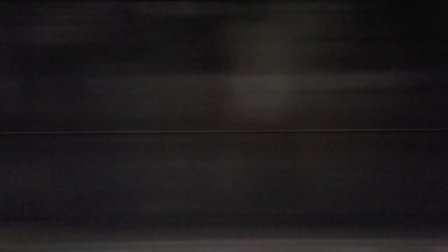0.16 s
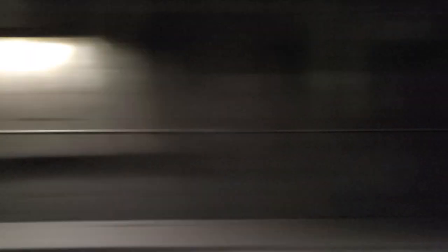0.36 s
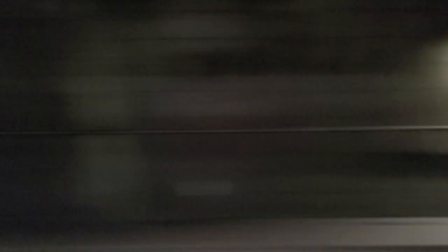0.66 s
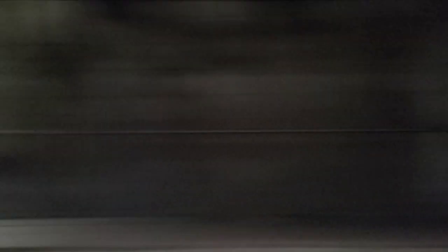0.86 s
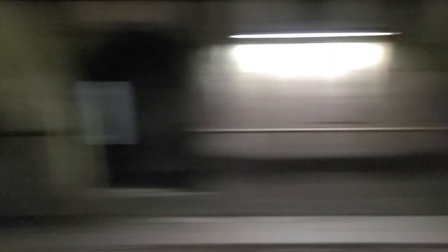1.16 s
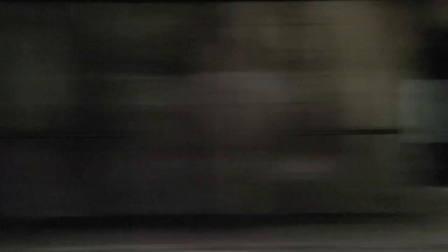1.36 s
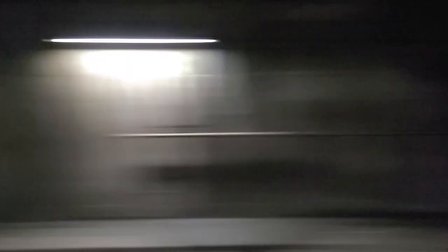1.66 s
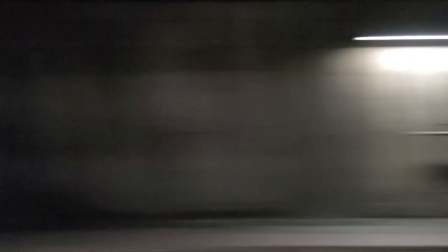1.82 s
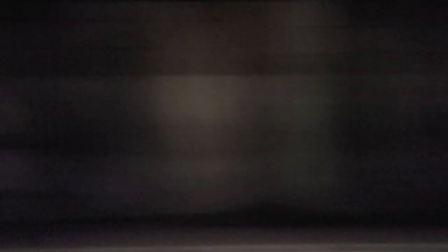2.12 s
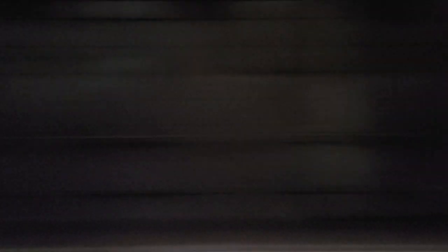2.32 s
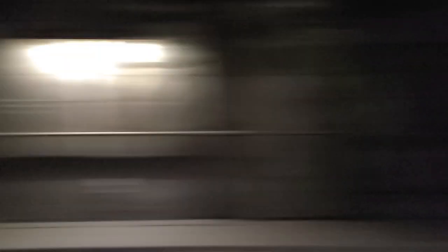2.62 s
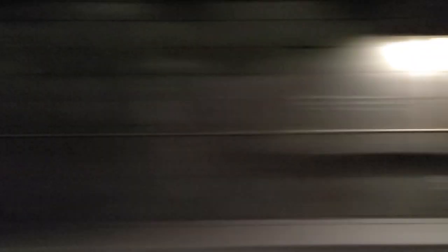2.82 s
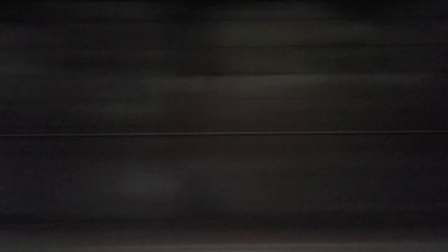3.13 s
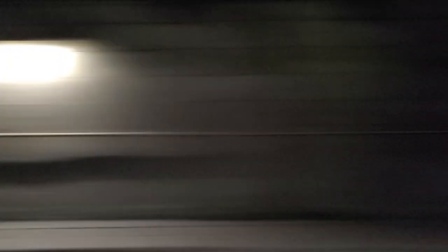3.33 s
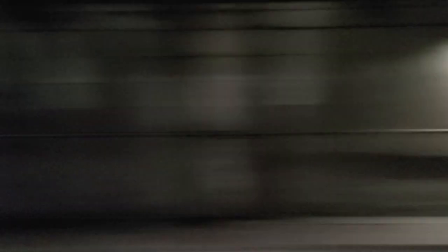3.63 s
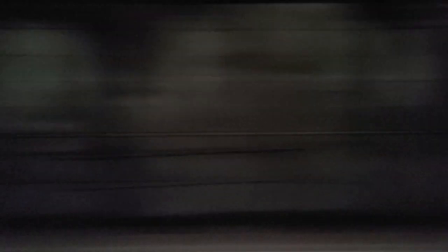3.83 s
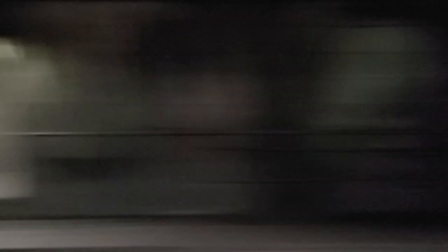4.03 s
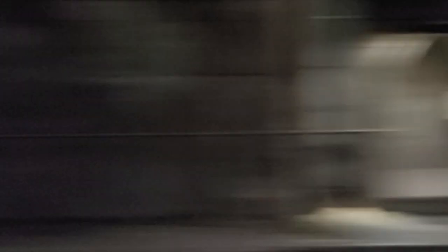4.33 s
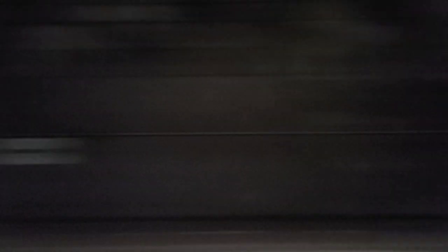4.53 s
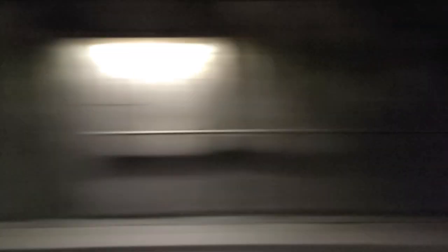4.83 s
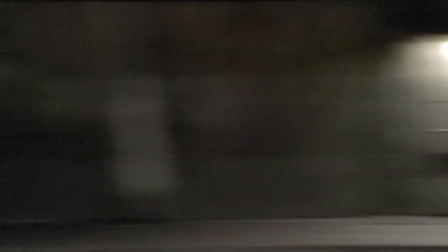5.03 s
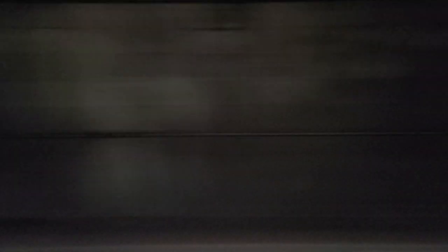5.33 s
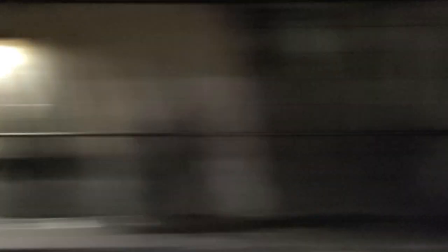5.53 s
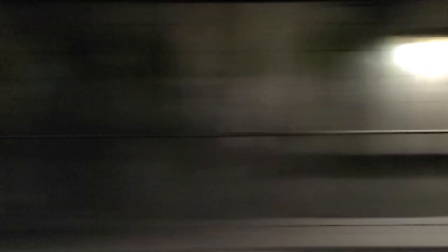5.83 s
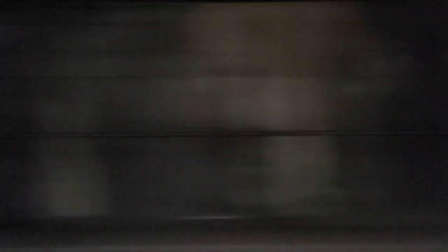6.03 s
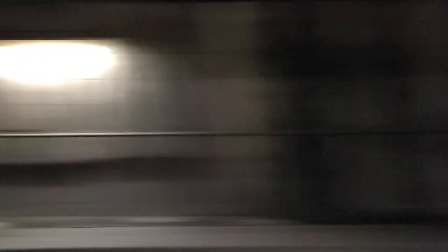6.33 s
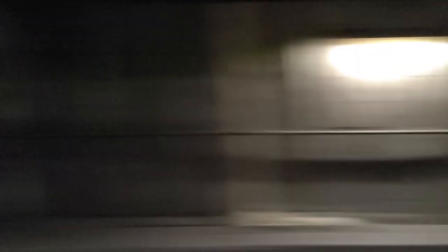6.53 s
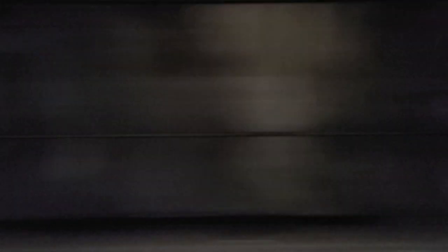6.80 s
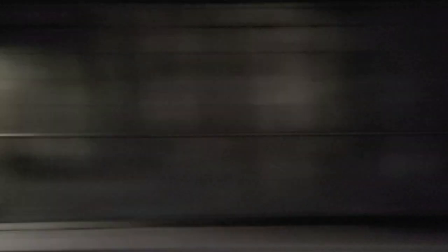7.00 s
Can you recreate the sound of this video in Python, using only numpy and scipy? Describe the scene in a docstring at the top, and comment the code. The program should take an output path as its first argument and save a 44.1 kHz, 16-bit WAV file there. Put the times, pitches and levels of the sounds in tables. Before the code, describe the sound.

Continuous tunnel ride heard within the car by two spaced microphones. A rough opening of throbbing low booms, gritty roar and rushing noise subsides after two seconds into even rolling. The roar and low gear hum slowly swell again, with soft bumps of boom later on. Ventilation hiss stays very faint, and two tiny bright metallic taps come just before the end.

```python
"""Metro car in a tunnel

Inside the car, on two spaced microphones: wheel and rail roughness shakes the floor into a rumble of shaped
noise, with wavering tones for the booming body. Bands of noise make the rail roar off the tunnel walls, a harsh
rush that surges with the loud rumble, slow air pressure and ventilation; thin tones make gear hum, whistles and
motor whine. The ride opens loud, runs smooth and slowly gathers; a small metal fitting clinks twice."""
import sys
import numpy as np
from scipy import signal
from scipy.fft import rfft, irfft, next_fast_len
from scipy.io import wavfile
from scipy.ndimage import uniform_filter1d

SR = 44100
rng = np.random.default_rng(int(sys.argv[2]) if len(sys.argv) > 2 else 0)


def dump(signal):
    """Clip the signal to [-1, 1] and save it as 16-bit WAV at the path in sys.argv[1]."""
    limited = np.clip(np.atleast_2d(signal).T, -1, 1)
    pcm = np.round(limited * 32767).astype(np.int16)
    wavfile.write(sys.argv[1], SR, pcm)


N = 315756  # samples, about 7.16 s

# Course of the ride before surges: t/s, then level/dB of deep rumble, upper rumble, rail roar, rush
RIDE = [(0.0, -19, -21.5, -20, -42), (0.6, -18.5, -18.5, -22, -37.5), (1.25, -18, -20.5, -26, -38.5),
        (1.8, -21.5, -22.5, -27.5, -42.5), (2.2, -24, -28, -27.5, -48), (2.8, -25, -28.5, -26.5, -51.5),
        (3.55, -24, -27.5, -26, -55), (4.3, -23, -26, -24, -50.5), (5.4, -21, -27, -23, -49),
        (6.0, -21, -24, -23, -47.5), (7.16, -21.5, -27.5, -22.5, -44)]
# Surges of the rumble and rush: start t/s, length/s, lift/dB
SURGES = [(-.1, .18, 3), (.29, .16, 4), (.81, .29, 5), (1.42, .34, 6), (1.93, .14, 2.5), (4.98, .14, 2.5),
          (6.17, .19, 6)]
SURGE_EDGE_S = 0.15
SURGE_SHARES = [0.49, 0.5, 0.16, 1]  # share of the lift in dB taken by deep, upper, roar, rush

# Colour of the floor rumble: f/Hz, level/dB
RUMBLE_COLOUR = [(26, -38), (45, -9.5), (65, -2.5), (96, -5.5), (135, -4.5), (156, -7.5), (180, -7),
                 (250, -8.5), (328, -10), (370, -8.5), (498, -20), (620, -23), (810, -58.5), (1360, -120)]
RUMBLE_SPLIT_HZ = 265  # the floor panels above this pitch swell apart from the frame below it
# Resonances of wheel, rail and floor in the rolling noise: f/Hz, width/Hz, lift/dB
WHEEL_MODES = [(261.4, 18, 3.5), (664, 44, 3), (1550, 24, 3.5), (1800, 140, 2.5), (2300, 250, 1.5),
               (2440, 100, -0.5)]

# Body booms between swells, low, high and panel: f/Hz, mean level/dB, share of the deep rumble's swing,
# wander/Hz, unsteadiness/dB
BOOM_MURMUR = [(65, -29, .7, 3, 4), (94, -32, .1, 7, 4), (196, -40, .7, 8, 4)]
# Loud swells of the lower boom: start t/s, length/s, level/dB, f/Hz
LOW_SWELLS = [(0.04, 0.2, -16.5, 65.1), (0.29, .35, -20, 65.46), (0.739, 0.18, -16, 64.3),
              (1.02, 0.38, -16, 62.4), (1.34, 0.19, -16.5, 63.8), (1.636, 0.1, -17, 63.7),
              (1.914, 0.14, -20.5, 64.3), (3.957, 0.049, -21.5, 63.5), (4.088, 0.072, -21.5, 61),
              (4.982, .13, -20, 63.9), (5.155, 0.17, -24, 67.86), (5.401, 0.14, -18.5, 67.35),
              (5.992, 0.1, -17.5, 66.46), (6.134, 0.13, -17.5, 69.3), (6.374, 0.1, -17.5, 64.9),
              (6.641, 0.18, -17.5, 68), (6.998, 0.14, -21, 66.7)]
# Loud swells of the upper boom: start t/s, length/s, level/dB, f/Hz
HIGH_SWELLS = [(0.009, 0.24, -20, 102), (0.29, 0.2, -22.5, 97.9), (0.57, 0.13, -23, 95.7),
               (1.587, 0.14, -33, 100.7), (2.42, 0.12, -21.5, 99.3), (3.611, 0.099, -21.5, 94.8),
               (5.018, .12, -20, 97.7), (5.365, 0.13, -24, 93.1), (5.56, .09, -23, 98.1),
               (5.74, 0.076, -19.5, 95.7), (6.05, 0.084, -22.5, 93.5), (6.169, 0.12, -15.5, 94.4),
               (6.658, 0.13, -24.5, 95.5), (6.867, 0.14, -22.5, 97.7)]
# Swells of a floor panel above the booms: start t/s, length/s, level/dB, f/Hz
PANEL_SWELLS = [(.8, 0.15, -22.5, 195.3), (1.446, 0.26, -21.5, 198.2), (1.779, 0.11, -26.5, 190.7)]
SWELL_EDGE_S = 0.039
# Gear hum gathering under load and dropping back: t/s, level/dB
GEAR_HUM = [(0, -36), (3.9, -35), (4.15, -30), (4.55, -28.5), (4.85, -25), (5.0, -27), (5.15, -35),
            (5.3, -35), (5.42, -26.5), (5.8, -27), (6.1, -24.5), (6.25, -36), (6.55, -32), (6.7, -27),
            (6.9, -25), (7.05, -33), (7.16, -36)]
GEAR_HZ = 156.6
# A hum that rises and passes: t/s, f/Hz, level/dB
PASSING_HUM = [(1.05, 141, -30), (1.3, 142, -24), (1.45, 135, -23), (1.7, 138.5, -22), (1.9, 139.5, -25),
               (2.1, 140, -31), (2.3, 142, -34)]

# Colour of the rail roar: f/Hz, level/dB
ROAR_COLOUR = [(300, -20.5), (455, -8.5), (605, -9), (700, -5.5), (836, -3.5), (947, -5.5), (1130, -7),
               (1380, -18), (1500, -19.5), (1650, -16.5), (1920, -21), (2280, -21.5), (2800, -25),
               (3100, -26), (3700, -37.5), (4300, -37.5), (4900, -41.5), (6300, -48), (8000, -56.5)]
# Wheel rings that sing in patches: f/Hz, width/Hz, level/dB re roar, wander/Hz, patch depth/dB,
# level change in the loud opening/dB
WHEEL_SONG = [(815.5, 12, -15.5, 5, 3, -9.5), (841, 14, -14.5, 7, 2, -9.5), (1635, 120, -22, 30, 3, 0),
              (2325, 240, -22.5, 50, 3, 4.5)]
# How much of that level change applies: t/s, share
LOUD_OPENING = [(0, 1), (.9, 1), (1.3, 0.24), (2.0, .3), (3.5, 0), (4.0, 0.018), (7.16, 0.039)]

# Colour of the harsh rush: f/Hz, level/dB
RUSH_COLOUR = [(900, -8), (1250, -14), (1500, 0), (1900, -5.5), (2400, -7), (3500, -21), (4300, -21.5),
               (5600, -24), (6300, -27), (7300, -24.5), (8000, -32), (9000, -32.5), (10500, -37.5),
               (13000, -43.5), (16000, -61)]
RUSH_SPLIT_HZ, RUSH_TREBLE_DB = 4900, -17.5  # treble level re middle

# Slow air pressure in the car: t/s, level/dB
BUFFET = [(0.0, -23), (.3, -17.5), (.5, -33), (1.3, -35), (1.55, -53), (2.0, -32.5), (3.2, -24.5),
          (4.4, -27.5), (5.4, -28.5), (6.3, -27.5), (7.16, -21)]
# Colour of that pressure: f/Hz, level/dB
BUFFET_COLOUR = [(12, -22), (24, -5.5), (45, -8.5), (60, -30)]

# Small metal fitting, the taps: t/s, level/dB, brightness/dB per octave
CLINKS = [(6.8575, -43, 0), (6.906, -51, -3)]
# Ringing modes of the fitting: f/Hz, level/dB, t60/s
FITTING = [(6158, 1, .085), (7700, -17, .1), (8790, -20, .04), (9765, -17, .09), (9910, -15, .07),
           (10340, -20, .12), (10830, -22, .1), (11770, -14, .06), (12290, -7, .065), (12670, -11, .055),
           (13430, -22, .05), (14290, -15, .12), (15160, -26, .06)]
CLINK_ATTACK_S = .002

# Faint hums and whistles that follow the roar: f/Hz, level/dB re roar, wander/Hz, from t/s, until t/s
WHISTLES = [(308, -11, 3, .3, 1.0), (330, -12, 2, 4.2, 5.1), (689, -15, 2, .3, 1.8),
            (5385, -48, 8, .2, 1.8), (4673, -48.5, 4, 2.0, 7.3), (5082, -49.5, 5, 2.0, 7.3),
            (7014, -47, 5, 0, 7.3), (7219, -50, 9, 0, 7.3)]
# Motor whine: multiple of the motor pitch, level/dB re roar
MOTOR_ORDERS = [(10, -34), (11, -30), (12, -32.5), (13, -35), (14, -37)]
MOTOR_HZ, MOTOR_FROM_S = 205, 2.0
# Thin hum in the middle of the roar: t/s, level/dB
MID_HUM = [(2.4, -52), (3.0, -40), (3.6, -41), (3.75, -34), (4.2, -34), (4.4, -38), (5.0, -38), (5.17, -33),
           (5.5, -36), (6.2, -37), (6.6, -34), (7.16, -37)]
MID_HUM_HZ = 763

# Colour of the air hiss: f/Hz, level/dB
AIR_HISS = [(6000, -5), (8000, 0), (9000, 0), (10500, -5), (13000, -3), (14500, -5), (16000, -8)]
AIR_HISS_DB = -51.5  # re roar, before the growth below
# The air hiss gains on the roar: t/s, level/dB
AIR_GROWTH = [(0, -1), (3.5, 0.5), (5.5, 0), (6.3, 3.5), (7.16, 2)]
# Narrow hiss of the ventilation: f/Hz, width/Hz, level/dB
VENT_BAND = (7090, 530, -62)

# Level at the left microphone less the right: f/Hz, level/dB
LEFT_EAR = [(60, -0.5), (500, -1.5), (1200, -2), (2000, -0.5), (2400, -2), (3450, 4), (4300, -1),
            (6500, -4), (8300, -1.5), (12400, -10), (15000, -19.5)]
# An all-round field at two spaced microphones swings between alike and opposed: f/Hz, left-right likeness
LIKENESS = [(60, .99), (170, .94), (345, .89), (520, .6), (860, .08), (1400, -.36), (1750, -.29),
            (2300, .56), (2750, -.03), (3450, -.34), (4100, .31), (4800, -.2), (5500, 0), (6200, -.2),
            (6900, .2), (8000, .1), (9000, 0)]


def from_db(db):
    """Decibels to gain."""
    return 10 ** (np.asarray(db) / 20)


def rms_one(x):
    """Scaled to unit power."""
    return x / np.sqrt(np.mean(x ** 2) + 1e-20)


def in_time(rows):
    """Columns of a curve table, one value per sample."""
    s, *columns = np.transpose(rows)
    return [np.interp(np.arange(N) / SR, s, column) for column in columns]


def at_hz(points, hz):
    """A spectrum read on a log-frequency axis."""
    table_hz, values = np.transpose(points)
    return np.interp(np.log(hz + 1), np.log(table_hz), values)


def between(start_s, end_s):
    """One between two moments, with 0.2 s ramps inside them."""
    t = np.arange(N) / SR
    return np.clip((t - start_s) / .2, 0, 1) * np.clip((end_s - t) / .2, 0, 1)


def soft_window(start_s, length_s, edge_s):
    """Rise, hold and fall, with ramps centred on both ends."""
    t = np.arange(N) / SR
    return np.clip(np.minimum(t - start_s, start_s + length_s - t) / edge_s + .5, 0, 1)


def drift(rate_hz):
    """Slow chance of spread 1: noise at a fortieth of the sample rate through a double one-pole low-pass."""
    pole = np.exp(-80 * np.pi * rate_hz / SR)
    noise = rng.standard_normal(N // 40 + 2002)
    slow = signal.lfilter([1], [1, -2 * pole, pole * pole], noise)[2000:]  # settled part only
    return np.interp(np.arange(N) / 40, np.arange(len(slow)), rms_one(slow))


def wavering(hz, level_db, wander_hz, rate_hz):
    """A tone of given rms level whose pitch wanders at random."""
    turns = np.cumsum(hz + wander_hz * drift(rate_hz)) / SR + rng.random()
    return np.sqrt(2) * from_db(level_db) * np.sin(2 * np.pi * turns)


def diffuse(gain_at):
    """Coloured noise arriving from all round at two spaced microphones; unit power in their mean."""
    size = next_fast_len(N)
    hz = np.arange(size // 2 + 1) * SR / size
    alike = at_hz(LIKENESS, hz)
    mid, side = rfft(rng.standard_normal((2, size))) * gain_at(hz)
    pair = np.sqrt(1 + alike) * mid + np.sqrt(1 - alike) * side * [[1], [-1]]
    balance = from_db(at_hz(LEFT_EAR, hz) * [[.5], [-.5]])
    pair = irfft(pair * balance, size)[:, :N]
    return pair / np.std(pair.mean(axis=0))


def inside(spectrum, hz):
    """True between the ends of a tabled spectrum."""
    return (hz > spectrum[0][0]) * (hz < spectrum[-1][0])


def coloured(spectrum):
    """Diffuse noise with a tabled spectrum, silent beyond its ends."""
    return diffuse(lambda hz: from_db(at_hz(spectrum, hz)) * inside(spectrum, hz))


def surge():
    """Lift in dB during the surges: each one rises, holds and falls."""
    return sum(db * soft_window(s, length_s, SURGE_EDGE_S) for s, length_s, db in SURGES)


def ringing_db(hz):
    """Lift that the resonances of wheel, rail and floor give the rolling noise."""
    return sum(db / (1 + (2 * (hz - mode_hz) / width_hz) ** 2) for mode_hz, width_hz, db in WHEEL_MODES)


def rumble(deep_db, upper_db):
    """Wheel roughness through frame and floor: one colour, shared out between a deep and an upper part."""
    def colour(hz):
        return from_db(at_hz(RUMBLE_COLOUR, hz) + ringing_db(hz))
    deep = diffuse(lambda hz: colour(hz) / np.sqrt(1 + (hz / RUMBLE_SPLIT_HZ) ** 6))
    upper = diffuse(lambda hz: colour(hz) / np.sqrt(1 + (RUMBLE_SPLIT_HZ / (hz + 1)) ** 6))
    return from_db(deep_db) * deep + from_db(upper_db + .5 * drift(18)) * upper


def booms(deep_db):
    """Three body resonances: an unsteady murmur that gives way to loud swells with soft edges."""
    out = 0
    deep_swing_db = deep_db - deep_db.mean()
    for swells, murmur in zip((LOW_SWELLS, HIGH_SWELLS, PANEL_SWELLS), BOOM_MURMUR):
        hz, db, follows, wander_hz, unsteady_db = murmur
        gain = from_db(db + follows * deep_swing_db + unsteady_db * drift(5.4))
        pitch_hz = hz + wander_hz * drift(2.97)
        for s, length_s, level_db, swell_hz in swells:
            share = soft_window(s, length_s, SWELL_EDGE_S)
            gain = gain + share * (from_db(level_db) - gain)
            pitch_hz = pitch_hz + share * (swell_hz - pitch_hz)
        out = out + gain * wavering(pitch_hz, 0, 1.6, 8.6)
    return out


def body(deep_db):
    """Booms and hums carried by the car body: long waves, nearly the same at both microphones."""
    passing_hz, passing_db = in_time(PASSING_HUM)
    passing = wavering(passing_hz, passing_db, 1.0, 2.8)
    passing = passing * between(PASSING_HUM[0][0], PASSING_HUM[-1][0])
    gears = wavering(GEAR_HZ, in_time(GEAR_HUM)[0] + .7 * drift(5.0), .7, 4.0)
    return (booms(deep_db) + passing + gears) * from_db([[-.4], [.4]])


def rail_roar(roar_db):
    """Rolling noise ringing in the wheel modes and returned by the tunnel walls, made as shaped noise."""
    noise = diffuse(lambda hz: from_db(at_hz(ROAR_COLOUR, hz) + ringing_db(hz)) * inside(ROAR_COLOUR, hz))
    return from_db(roar_db + .5 * drift(7.7)) * noise


def wheel_song(roar_db):
    """Narrow rings of noise whose pitch wanders and whose strength comes in patches."""
    out, opening = 0, np.clip(in_time(LOUD_OPENING)[0], 0, 1)
    for hz, width_hz, db, wander_hz, patch_db, change_db in WHEEL_SONG:
        # slow complex noise shifted up to the ring's pitch
        lowpass = signal.butter(2, width_hz / 2, fs=SR, output="sos")
        slow = signal.sosfilt(lowpass, rng.standard_normal((4, N)))
        carrier = np.exp(2j * np.pi * np.cumsum(hz + wander_hz * drift(1.5)) / SR)
        mid, side = rms_one(np.real((slow[:2] + 1j * slow[2:]) * carrier))
        alike = at_hz(LIKENESS, hz)
        pair = mid + np.sqrt((1 - alike) / (1 + alike)) * side * [[1], [-1]]
        balance = from_db(at_hz(LEFT_EAR, hz) * np.array([[.5], [-.5]]))
        level_db = roar_db + db + change_db * opening + patch_db * drift(6.0)
        out = out + from_db(level_db) * pair * balance
    return out


def rush(level_db):
    """Harsh rush: middle and treble noise bands that swell together."""
    def colour(hz):
        return from_db(at_hz(RUSH_COLOUR, hz))
    rush_db = level_db + 0.95 * drift(5.0)
    middle = diffuse(lambda hz: colour(hz) * (hz > RUSH_COLOUR[0][0])
                     / np.sqrt(1 + (hz / RUSH_SPLIT_HZ) ** 8))
    treble = diffuse(lambda hz: colour(hz) / np.sqrt(1 + (RUSH_SPLIT_HZ / (hz + 1)) ** 8))
    return from_db(rush_db) * middle + from_db(rush_db + RUSH_TREBLE_DB) * treble


def buffet():
    """Slow air pressure in the car: very low noise with an uneven level."""
    return from_db(in_time(BUFFET)[0] + 2.5 * drift(3.3)) * coloured(BUFFET_COLOUR)


def clinks():
    """Each tap rings the modes of the fitting, unsteadily as it chatters, with a short bright rattle on top."""
    out, t = np.zeros(N), np.arange(SR // 4) / SR
    for s, tap_db, tilt_db in CLINKS:
        ringing = 0
        for hz, db, t60 in FITTING:
            chatter_db = uniform_filter1d(rng.standard_normal(len(t)), size=90) * 20  # smoothed over 2 ms
            bright_db = tilt_db * np.log2(hz / FITTING[0][0])
            mode_gain = from_db(db + bright_db + chatter_db - 60 * t / t60)
            ringing = ringing + mode_gain * np.sin(2 * np.pi * hz * t)
        # differenced noise is bright; it falls 60 dB in 0.06 s
        rattle = np.diff(rng.standard_normal(len(t) + 1)) * from_db(-18 - 60 * t / .06)
        attack = np.minimum(t / CLINK_ATTACK_S, 1)
        tap = from_db(tap_db) * attack * (ringing + rattle)
        at = round(s * SR)
        out[at:at + len(t)] += tap[:N - at]
    return out * from_db([[-1.5], [1.5]])  # a little to the right


def motor_whine(roar_db):
    """High multiples of one wandering motor pitch, each of unsteady strength."""
    turns = np.cumsum(MOTOR_HZ + .25 * drift(3.0)) / SR
    whine = 0
    for order, db in MOTOR_ORDERS:
        gain = np.sqrt(2) * from_db(roar_db + db + 2.5 * drift(2.5))
        whine = whine + gain * np.sin(2 * np.pi * (order * turns + rng.random()))
    return between(MOTOR_FROM_S, N / SR + 1) * whine


def whistles(roar_db):
    """Thin wandering tones of slowly changing strength, a mid hum and the motor whine."""
    tones = 0
    for hz, db, wander_hz, start_s, end_s in WHISTLES:
        tone = wavering(hz, roar_db + db + 2.5 * drift(2.5), wander_hz, 6.0)
        tones = tones + between(start_s, end_s) * tone
    mid_hum = wavering(MID_HUM_HZ, in_time(MID_HUM)[0] + drift(5.0), 1.0, 4.0)
    return (tones + mid_hum + motor_whine(roar_db)) * from_db([[-.6], [.6]])


def air_hiss(roar_db):
    """High noise that follows the roar and gains on it."""
    return from_db(roar_db + AIR_HISS_DB + in_time(AIR_GROWTH)[0]) * coloured(AIR_HISS)


def ventilation():
    """Narrow band of noise, almost steady in level."""
    centre_hz, width_hz, vent_db = VENT_BAND
    band = diffuse(lambda hz: 1 / (1 + (2 * (hz - centre_hz) / width_hz) ** 4))
    return from_db(vent_db + .5 * drift(12.0)) * band


def scene():
    """All that sounds in the car, at the two microphones."""
    deep_db, upper_db, roar_db, rush_db = in_time(RIDE) + np.outer(SURGE_SHARES, surge())
    rolling = rumble(deep_db, upper_db) + body(deep_db) + rail_roar(roar_db) + wheel_song(roar_db)
    details = rush(rush_db) + buffet() + clinks() + whistles(roar_db)
    return rolling + details + air_hiss(roar_db) + ventilation()


def record(dry):
    """Peaks are gently rounded, then a steep low-pass cuts the top."""
    rounded = 1.6 * np.tanh(dry / 1.6)
    top_cut = signal.ellip(10, .5, 70, 15700, fs=SR, output="sos")  # ripple/dB, stopband/dB, edge f/Hz
    return signal.sosfilt(top_cut, rounded)


dry = scene()
out = record(dry)
dump(out)
```